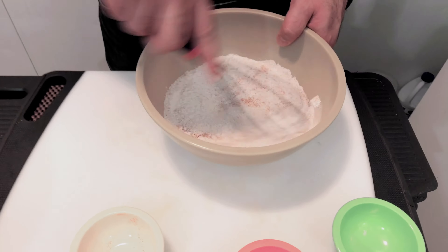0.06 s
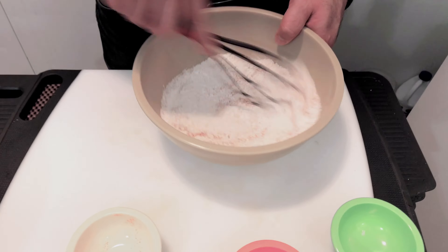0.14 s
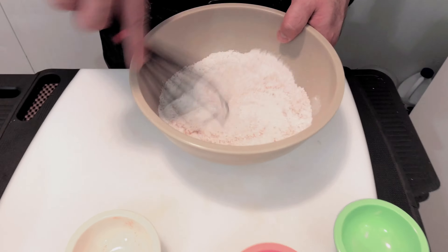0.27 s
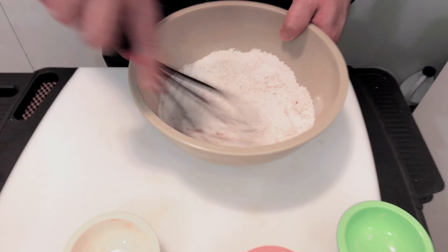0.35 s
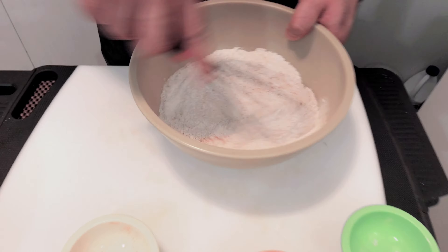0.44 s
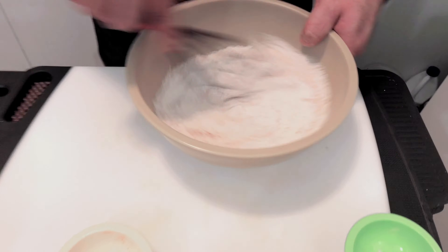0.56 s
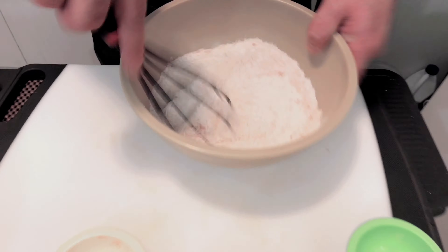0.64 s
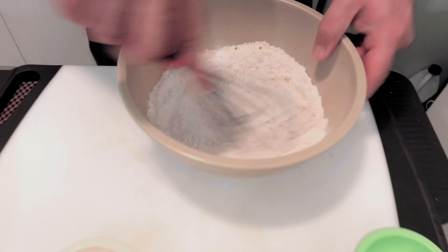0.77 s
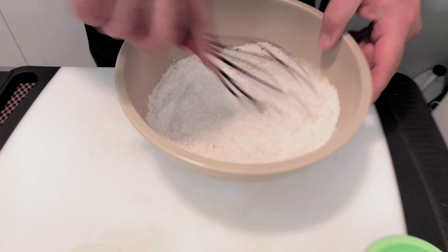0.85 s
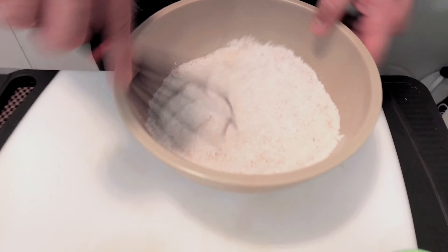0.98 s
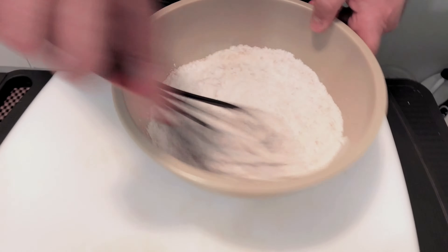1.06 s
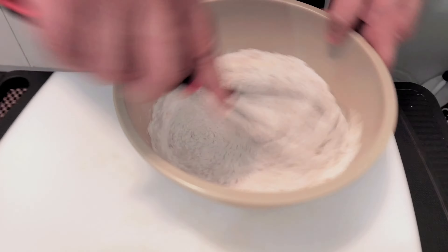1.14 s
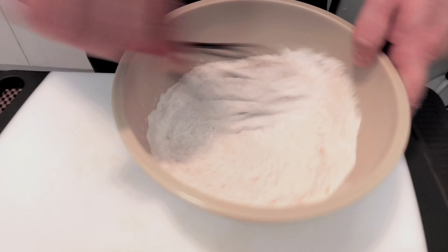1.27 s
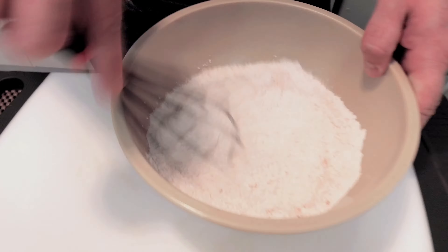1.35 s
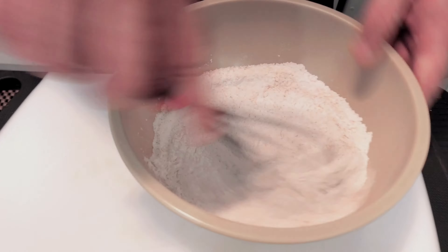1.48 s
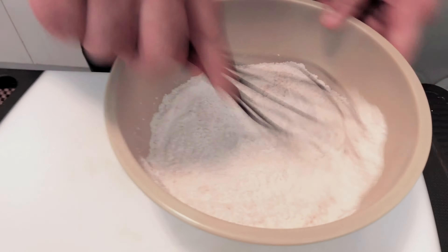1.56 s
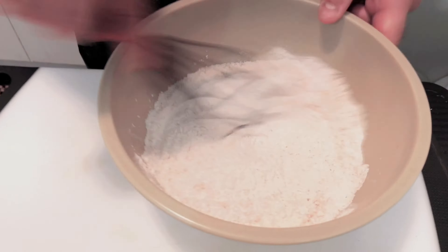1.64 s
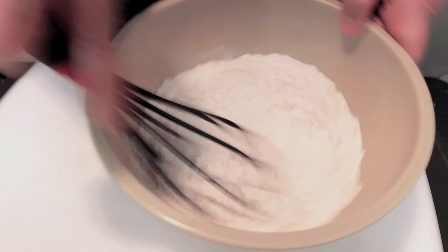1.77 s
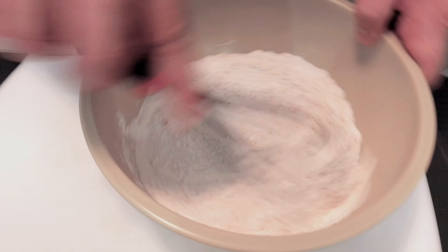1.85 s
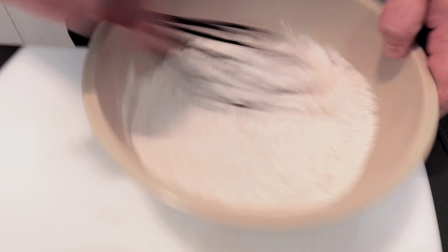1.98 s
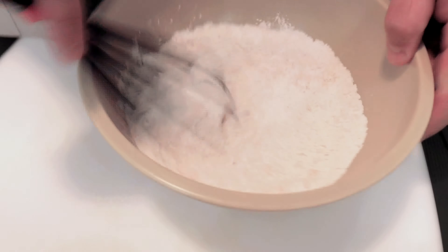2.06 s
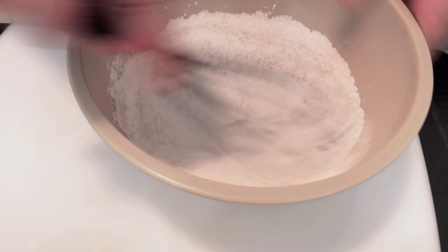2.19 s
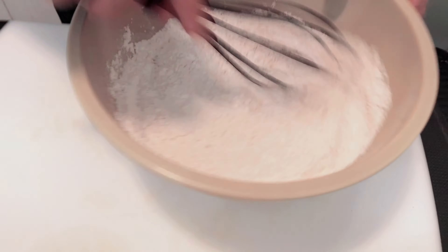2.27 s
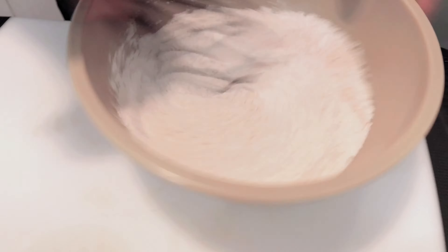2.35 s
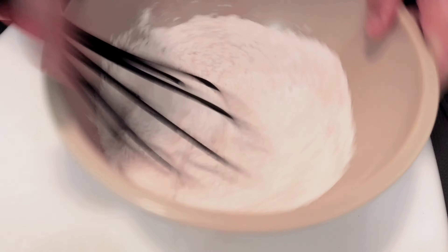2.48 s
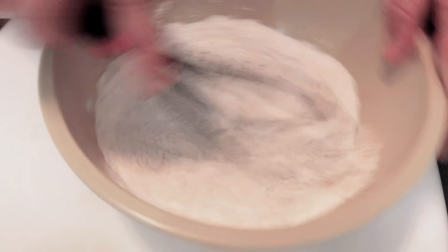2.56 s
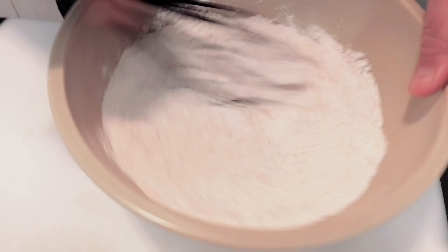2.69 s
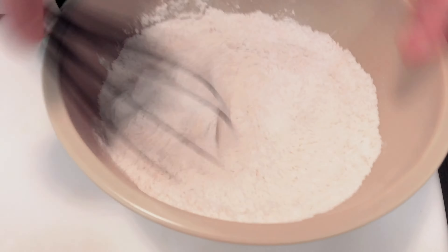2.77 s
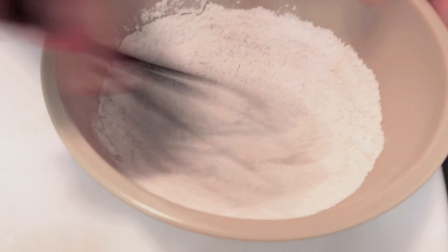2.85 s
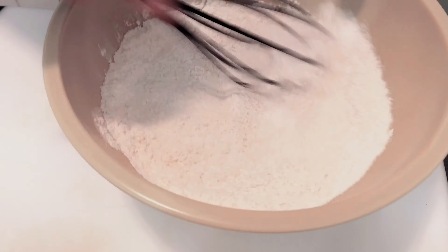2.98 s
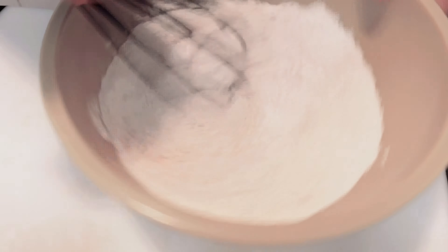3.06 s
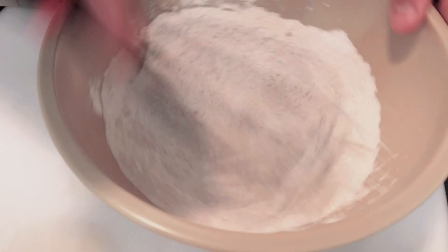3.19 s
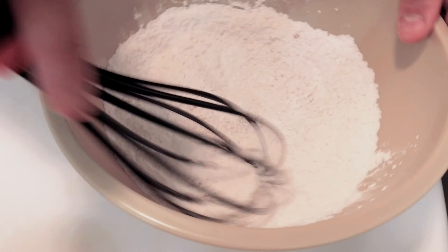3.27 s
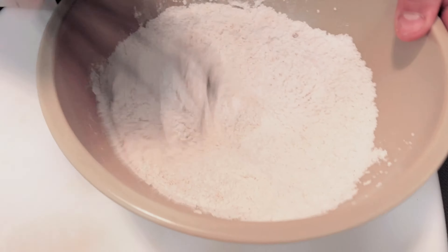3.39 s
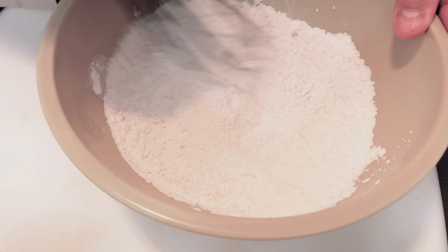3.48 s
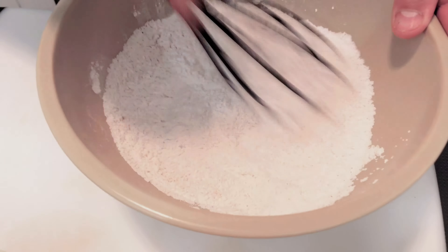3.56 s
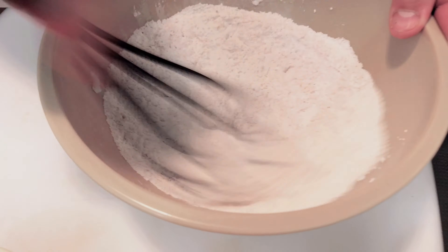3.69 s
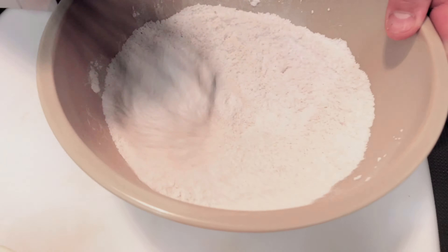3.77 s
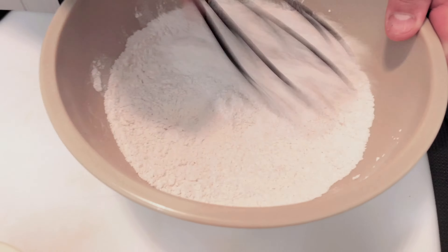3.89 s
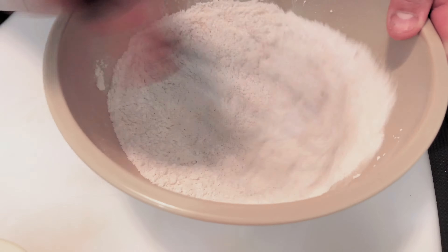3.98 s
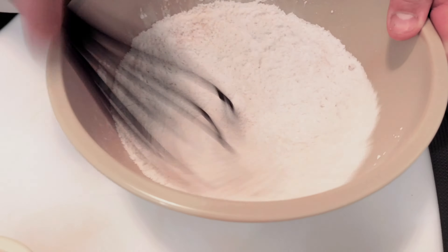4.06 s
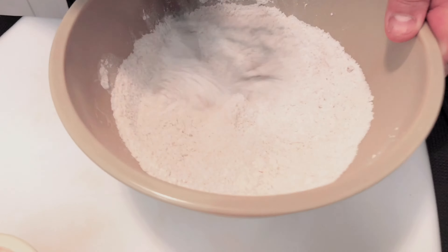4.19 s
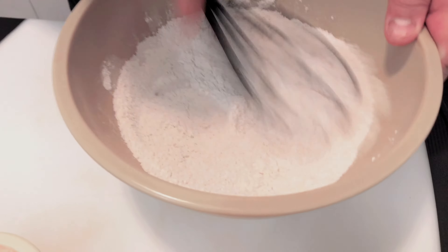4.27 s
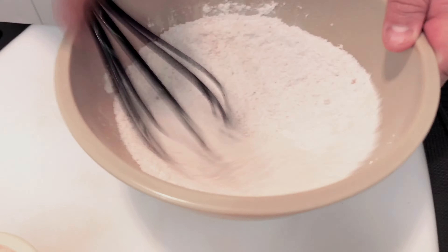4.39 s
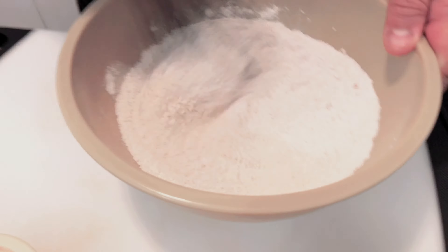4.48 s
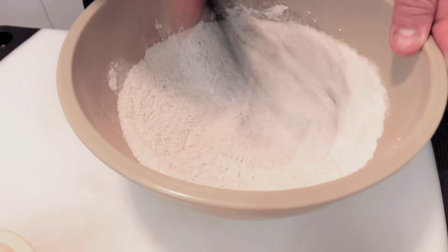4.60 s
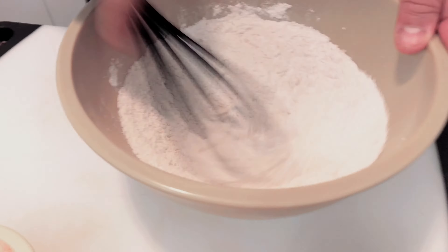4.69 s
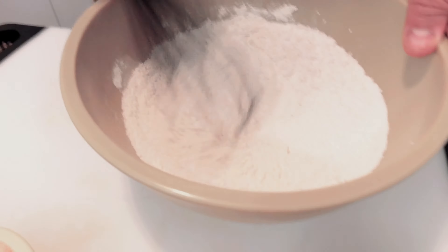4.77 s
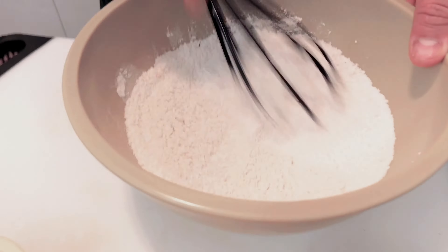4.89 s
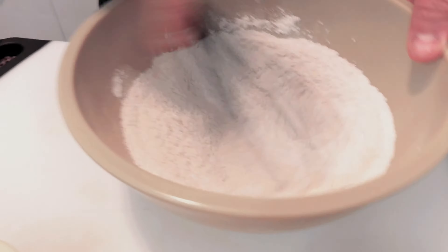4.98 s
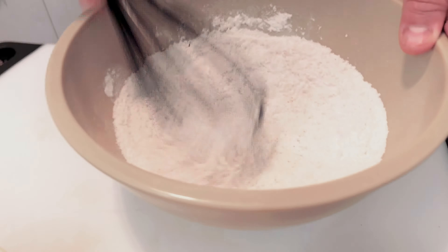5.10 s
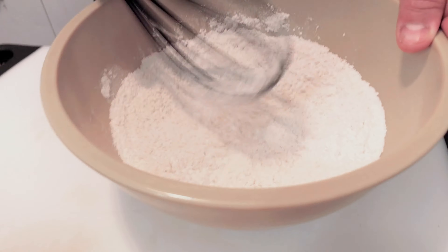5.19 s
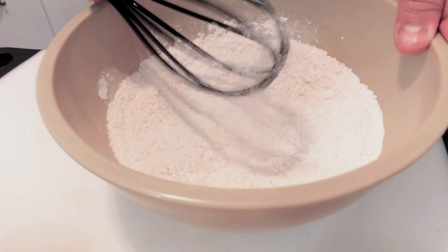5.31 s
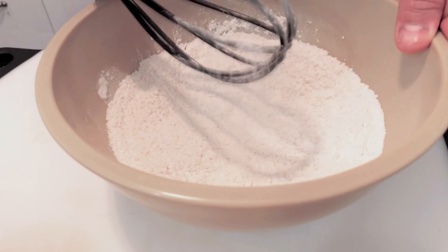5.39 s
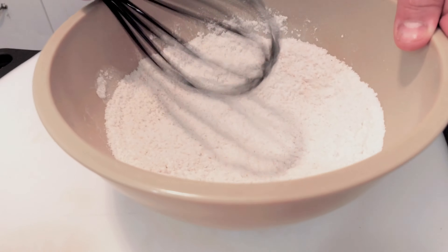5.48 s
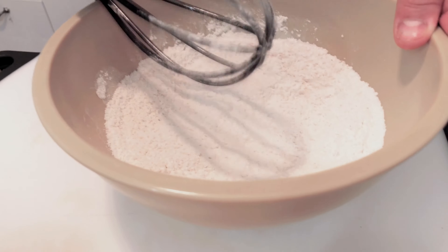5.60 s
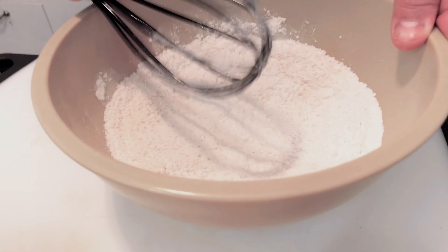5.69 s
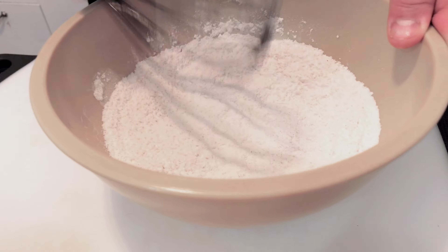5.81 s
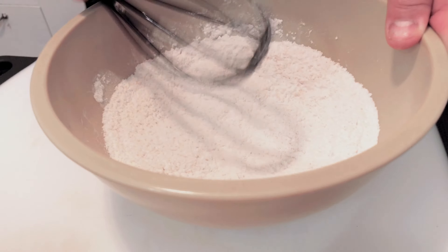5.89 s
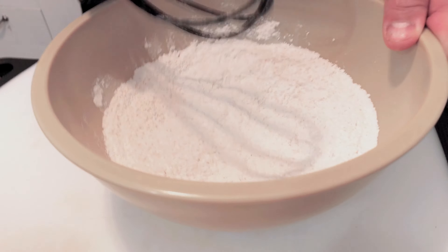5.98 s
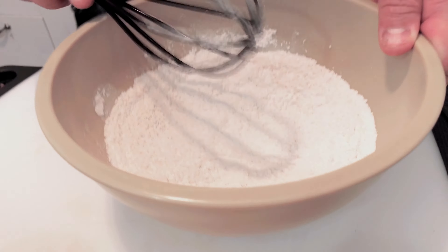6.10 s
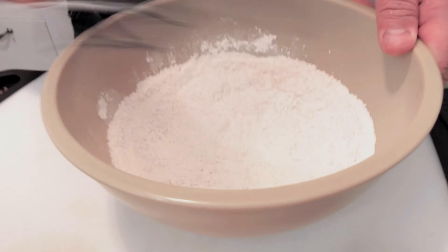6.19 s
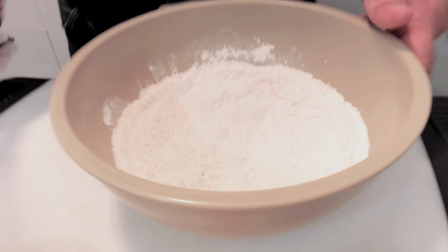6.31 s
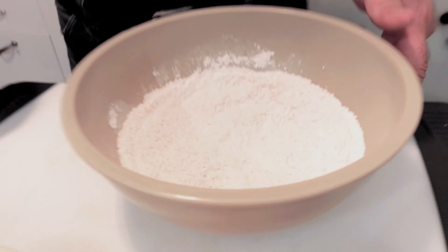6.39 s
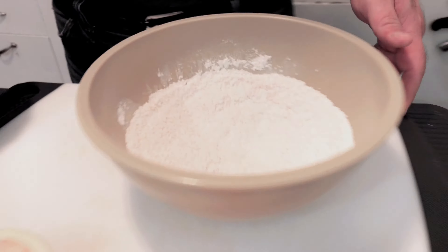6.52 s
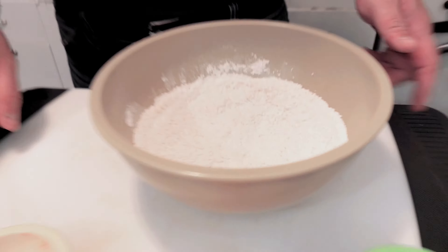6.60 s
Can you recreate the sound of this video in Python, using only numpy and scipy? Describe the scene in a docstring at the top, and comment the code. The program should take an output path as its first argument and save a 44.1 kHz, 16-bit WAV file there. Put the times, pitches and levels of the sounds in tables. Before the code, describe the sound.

Close, scratchy whisking of flour in a plastic bowl, ending with five ringing taps, two light clicks and a hollow clunk.

```python
"""A wire whisk scrapes and ticks through flour in a plastic mixing bowl, close by in a small kitchen.
Stick-slip friction excites the wires and the wall, and a gripping wire adds a gliding squeak.
Five raps on the rim follow: the steel loops ring, the bowl rocks and the worktop shudders.
Two light clicks and a dull clunk end the scene as the whisk is put aside."""
import sys
import numpy as np
from scipy import signal
from scipy.fft import rfft, irfft, next_fast_len
from scipy.io import wavfile
from scipy.ndimage import uniform_filter1d, map_coordinates

SR = 44100
rng = np.random.default_rng(int(sys.argv[2]) if len(sys.argv) > 2 else 0)


def materialize(psi):
    """Save the field psi as 16-bit PCM at rate SR to the path in sys.argv[1].

    A 1-D psi becomes a single channel; in a 2-D psi each row is a channel.
    """
    bounded = np.clip(np.atleast_2d(psi).T, -1, 1)
    quanta = np.round(bounded * 32767).astype(np.int16)
    wavfile.write(sys.argv[1], SR, quanta)


N = 293265


def amp(db):
    """Decibels to amplitude ratio."""
    return 10 ** (np.asarray(db) / 20)


def unit(x):
    """Normalisation to rms 1."""
    return x / np.sqrt(np.mean(x ** 2) + 1e-20)


def along(points, hz):
    """Interpolation of (frequency [Hz], value) points on a logarithmic frequency axis."""
    freqs, values = np.transpose(points)
    return np.interp(np.log(hz + 1), np.log(freqs + 1), values)


def seconds(count):
    """Time axis of count samples."""
    return np.arange(count) / SR


def add(track, s, sound):
    """Superposition: a sound joins the track at time s."""
    part = track[max(round(s * SR), 0):][:len(sound)]
    part += sound[:len(part)]


def wobble(rate):
    """Smooth random modulation: a spline through rate knots a second."""
    knots = rng.standard_normal(int(N * rate / SR) + 4)
    return map_coordinates(knots, [seconds(N) * rate])


def coloured(x, points):
    """Minimum-phase filtering by a spectrum of (frequency [Hz], level [dB]) points."""
    size = 2 * next_fast_len(len(x) // 2 + 4096)
    gain = amp(along(points, np.fft.rfftfreq(size, 1 / SR)))
    cepstrum = irfft(np.log(gain + 1e-6))
    cepstrum[1:size // 2] *= 2  # folding the cepstrum makes the filter causal
    cepstrum[size // 2 + 1:] = 0
    return irfft(rfft(x, size) * np.exp(rfft(cepstrum)))[:len(x)]


def ring(modes):
    """Free vibration: a sum of damped modes, each struck with random strength and sign."""
    t = seconds(SR // 3)
    strike = amp(rng.standard_normal(len(modes))) * rng.choice([-1, 1], len(modes))
    return sum(gain * amp(db - 60 * t / t60) * np.sin(2 * np.pi * hz * t)
               for gain, (hz, db, t60) in zip(strike, modes))


def chatter(spectrum, hold_s, t60):
    """Contact noise: a filtered burst that holds briefly, then decays exponentially."""
    t = seconds(SR // 8)
    envelope = amp(-60 * np.maximum(t - hold_s, 0) / t60)
    burst = coloured(rng.standard_normal(len(t)) * envelope, spectrum)
    return burst * np.linalg.norm(envelope) / np.linalg.norm(burst)


# Spectrum of the room noise: (frequency [Hz], spectral level [dB])
ROOM_NOISE = [(15, -12.5), (25, -2), (70, -8), (97, -7.5), (130, -29.5), (161, -17.5), (242, -32.5),
              (301, -20), (796, -33.5), (1400, -34), (2840, -36), (14800, -41), (16000, -57)]
def background(hum_hz=45.0):
    """Ambient noise: a quiet broadband floor and a low, amplitude-modulated hum."""
    hum = amp(-58 + 2.2 * wobble(2.7)) * np.sin(2 * np.pi * hum_hz * seconds(N))
    return hum + amp(-56) * unit(coloured(rng.standard_normal(N), ROOM_NOISE))


# Reverberation time of the kitchen: (frequency [Hz], t60 [s])
ROOM_DECAY = [(100, 0.29), (500, 0.45), (4000, 0.35), (9000, 0.23), (16000, 0.11)]
def kitchen(x, gap_s=0.0055):
    """Reverberation: convolution with a diffuse tail in which each frequency decays at its own rate."""
    hz, t, spectra = signal.stft(rng.standard_normal(SR // 2), SR, nperseg=256)
    decay = amp(-60 * t / along(ROOM_DECAY, hz)[:, None])
    tail = signal.istft(spectra * decay, SR, nperseg=256)[1]
    tail = np.pad(tail, (round(gap_s * SR), 0))
    return signal.fftconvolve(x, tail / np.linalg.norm(tail))[:N]


# Something heavy set down nearby: (time [s], level [dB])
CLUNK_IMPACT = (6.597, -15)
# Its contact noise: (frequency [Hz], spectral level [dB])
CLUNK_SPECTRUM = [(60, -5), (170, -14), (265, 0.5), (430, -21), (560, -5), (700, 1.5), (1000, -2.5),
                  (1500, -7.5), (2200, -16), (3000, -25), (5000, -40.5), (12000, -49.5)]
# Its resonances: (frequency [Hz], level [dB], t60 [s])
HOLLOW_MODES = [(222, -1, 0.13), (268, 0, 0.13), (650, 2, 0.054), (695, 6, 0.066), (897, 1, .06),
                (1010, -19, 0.12)]
def clunk():
    """Impact excitation: a dull contact sets low, hollow modes ringing."""
    out = np.zeros(N)
    s, db = CLUNK_IMPACT
    add(out, s, amp(db) * chatter(CLUNK_SPECTRUM, hold_s=0.0048, t60=0.012))
    add(out, s, amp(db - 4) * ring(HOLLOW_MODES))
    return out


# The bowl is jolted or drops on its base: (time [s], level [dB], hardness [dB], worktop level [dB])
BASE_BUMPS = [ (1.078, -35.5, -60, -39), (1.384, -33, -20, -45), (1.816, -30, -15, -27),
              (2.495, -31.5, -15.5, -31), (2.659, -30.5, 6, -52), (3.24, -27.5, 15, -38),
              (4.533, -32, -16, -52), (5.319, -29, -18, -47), (5.711, -28.5, -12, -49),
              (5.902, -20, -4, -50.5), (6.122, -25.5, -13, -50), (6.43, -33, 3, -48), (6.504, -37, -2, -36)]
def jolts(rim_to_base_s=0.004):
    """Structure-borne transmission: landings, bumps and raps all push the bowl; rows as in BASE_BUMPS."""
    landings = [(s, db, -4, db - 6.5) for s, *_, db in SWEEPS]
    blows = [(s + rim_to_base_s, db - 7, -5, db - 2.6) for s, db, *_ in RIM_RAPS]
    return landings + list(BASE_BUMPS) + blows


def worktop(hz=49.25, t60=0.25, tail_t60=0.82, rise_s=0.0096, lag_s=0.004):
    """Damped oscillation: each jolt starts a low swing of the worktop, with a faint long tail."""
    out, t = np.zeros(N), seconds(SR)
    decay = amp(-60 * t / t60) + amp(-18 - 60 * t / tail_t60)
    swing = np.sin(2 * np.pi * hz * t) * decay * (1 - np.exp(-t / rise_s))
    for s, _, _, db in jolts():
        add(out, s + lag_s, amp(db) * swing)
    return out


# Resonances of the plastic bowl: (frequency [Hz], level [dB], t60 [s])
BOWL_MODES = [(88.7, -1.5, 0.13), (124.6, 2, 0.071), (172.3, -1.5, 0.12), (216.7, -3, 0.15),
              (263.4, 3.5, 0.069), (296, 0, 0.029), (390, -19, 0.12), (560, -2.5, 0.022), (720, -8, 0.076),
              (993, 2, 0.016), (1126, -7, 0.038), (1283, -11.5, 0.059)]
def rocking_bowl(soft_hz=480):
    """Modal response: the harder a jolt, the more strongly it excites the modes above soft_hz."""
    out = np.zeros(N)
    for s, db, hardness_db, _ in jolts():
        modes = [(hz, mode_db + hardness_db * np.clip(np.log2(hz / soft_hz), 0, 1), t60)
                 for hz, mode_db, t60 in BOWL_MODES]
        add(out, s, amp(db - 10.5) * ring(modes))
    return out


def buzz(hz, width_hz, t60):
    """Line broadening: loops ring against each other, and random phase drift smears their pitch."""
    t = seconds(SR // 3)
    drift = np.cumsum(rng.standard_normal(len(t))) * np.sqrt(2 * np.pi * width_hz / SR)
    return np.sin(2 * np.pi * hz * t + uniform_filter1d(drift, size=24)) * amp(-60 * t / t60)


# Blows on the rim: (time [s], level [dB], loop pitch [Hz], loop gain [dB], zing pitch [Hz], zing gain [dB])
RIM_RAPS = [ (5.2717, -19.5, 4970, -11, 5990, -0.5), (5.4753, -22, 4700, -4.5, 5830, -4.5),
            (5.6531, -20, 4170, -4.5, 10100, -7.5), (5.8463, -17.5, 4020, -0.5, 9500, -2.5),
            (6.0604, -18, 3840, -1, 8780, 1)]
# Contact noise of steel on the rim: (frequency [Hz], spectral level [dB])
RAP_SPECTRUM = [(300, -20), (1100, -10.5), (1650, -10.5), (2400, -2.5), (4000, -9), (6000, -1),
                (7500, -7.5), (10500, -3.5), (13500, -3), (16000, -16)]
# Resonances of the steel loops: (frequency [Hz], level [dB], t60 [s])
LOOP_MODES = [(1600, 7, 0.063), (2700, -8.5, 0.083), (3060, -14, 0.14), (3790, 0.5, 0.14),
              (4100, -0.5, 0.21), (4870, -4, 0.16), (5770, -18, .12), (6406, -17, .12), (8400, -19, .15),
              (9356, -12, .15), (9674, -10, 0.1), (10980, -10, .15)]
def raps():
    """Selective excitation: the loops clatter on the rim, and where they land sets which of them ring."""
    out = np.zeros(N)
    for s, db, loop_hz, loop_db, zing_hz, zing_db in RIM_RAPS:
        add(out, s, amp(db) * chatter(RAP_SPECTRUM, hold_s=0.0027, t60=0.0081))
        add(out, s, amp(db - 27) * ring(LOOP_MODES))
        add(out, s, amp(db + loop_db) * buzz(loop_hz, width_hz=230, t60=0.048))
        add(out, s + 0.00064, amp(db + zing_db + 10) * buzz(zing_hz, width_hz=970, t60=0.012))
    return out


# Single wires snap against the wall: (time [s], level [dB], wall knock gain [dB])
WIRE_SNAPS = [ (0.1727, -15.5, -25), (0.8864, -19, -5), (1.597, -16.5, -20), (1.937, -17, -29),
              (2.0656, -8, -19), (2.073, -16, -8.5), (2.242, -10.5, -4), (2.396, -6.5, -15),
              (3.199, -29, -9), (3.2414, -21.5, -19), (3.9, -7, -10), (3.987, -9, -10.5),
              (4.441, -14.5, -14), (4.677, -18.5, -22), (5.5195, -27.5, -11), (6.111, -37, 3.5),
              (6.4283, -27, 2), (6.502, -29.5, 6)]
# Contact noise of one wire: (frequency [Hz], spectral level [dB])
TICK_SPECTRUM = [(500, -1), (2000, -28.5), (3800, 9), (6000, 2), (8500, 0), (12000, -3), (16000, -6)]
def ticks():
    """Impact transients: a wire flicks the wall, which answers with a short knock."""
    out = np.zeros(N)
    for s, db, knock_db in WIRE_SNAPS:
        add(out, s, amp(db - 12) * chatter(TICK_SPECTRUM, hold_s=0.0022, t60=0.015))
        add(out, s, amp(db + knock_db - 10) * chatter(WALL_SPECTRUM, hold_s=0.00027, t60=0.018))
    return out


def grit(rate, spread_db):
    """Poisson impulses: tiny slips of wire over powder, rate a second, of uneven size; rms 1."""
    slips = rng.random(N) < rate / SR
    return unit(slips * rng.standard_normal(N) * amp(spread_db * rng.standard_normal(N)))


def wall_echo(x, delay_s, travel, reflection):
    """Comb filtering: the curved wall returns the scrape after a delay that wanders as the whisk moves."""
    lag = delay_s * SR * np.exp(travel * wobble(9))
    return unit(x + reflection * map_coordinates(x, [np.arange(N) - lag], order=3))


def arch(t, start, length):
    """Envelope of a grip: a rise from 0 to 1 and back."""
    return np.sqrt(np.abs(np.sin(np.pi * np.clip((t - start) / length, 0, 1))))


# A wire digs through to the wall, swells and squeaks:
# (time [s], duration [s], wire gain [dB], wall gain [dB], start pitch [Hz], end pitch [Hz])
WIRE_GRIPS = [ (0.248, 0.067, 0.5, 13, 2650, 2320), (0.453, 0.033, 6, 2.5, 5960, 7000),
              (0.57, 0.053, -0.5, 4.5, 2660, 1880), (0.884, 0.043, 0, -10, 9100, 4200),
              (1.248, 0.05, 4.5, 5.5, 6550, 5330), (1.33, 0.11, 2, 7, 5500, 3200),
              (1.608, 0.025, 2.5, 1.5, 7200, 6130), (1.70, 0.047, 4, 5.5, 4130, 4770),
              (1.948, 0.051, 3, -6, 7340, 4600), (2.009, 0.064, -3, 12, 1950, 1600),
              (2.13, 0.083, 3.5, 3, 9500, 10500), (2.284, 0.088, 5.5, 6, 5950, 5030),
              (2.681, 0.054, 3, 11.5, 4350, 5520), (2.995, 0.072, 5, 6.5, 6800, 8100),
              (3.315, 0.078, 4, 7.5, 5770, 5000), (3.709, 0.039, 2, 4, 9400, 8000),
              (3.775, 0.11, 1.5, -2.5, 5100, 8750), (4.031, 0.041, -0.5, 5.5, 3000, 2600),
              (4.104, 0.051, 4, 4, 2580, 2130), (4.437, 0.068, 7, 6.5, 2340, 2900),
              (4.505, 0.089, 2, -4.5, 6260, 8200), (4.785, 0.092, 9.5, 8, 3200, 7150),
              (4.97, 0.094, 6.5, 5, 2540, 3520), ]
def contact_resonances(x, patchy_db, squeak_db=6.5, width_octaves=0.34):
    """Time-varying resonance: peaks come and go as wires touch the wall; a grip adds a gliding one."""
    hz, t, spectra = signal.stft(x, SR, nperseg=256)
    patches = uniform_filter1d(rng.standard_normal(spectra.shape), size=3, axis=0)
    patches = uniform_filter1d(patches, size=9, axis=1)
    lift_db = patchy_db * unit(patches)
    for start, length, _, _, from_hz, to_hz in WIRE_GRIPS:
        pitch = from_hz * (to_hz / from_hz) ** np.clip((t - start) / length, 0, 1)
        peak = np.exp(-(np.log2((hz[:, None] + 1) / pitch) / width_octaves) ** 2)
        lift_db += squeak_db * arch(t, start, length) * peak
    gain, power = amp(lift_db), np.mean(np.abs(spectra) ** 2, axis=1)
    gain /= np.sqrt(power @ gain ** 2 / power.sum())  # resonances share out power without adding to it
    return unit(signal.istft(spectra * gain, nperseg=256)[1][:N])


# Sweeps through the flour:
# (start [s], end [s], attack [s], level [dB], fall over the sweep [dB], wall gain [dB], landing bump [dB])
SWEEPS = [ (0.0, 0.107, 0.0067, -37.5, -1.5, -16, -47), (0.151, 0.496, 0.0072, -36.5, 3, -12, -41.5),
          (0.523, 0.585, .004, -30.5, -1, -10, -34), (0.656, 0.838, 0.0065, -36, 2.5, -13, -41),
          (0.885, 0.984, 0.0041, -32.5, 7.5, -7.5, -31), (0.997, 1.163, 0.0077, -33, -1.5, -14.5, -41),
          (1.216, 1.544, 0.0055, -33, 3.5, -14, -34.5), (1.594, 1.886, 0.0018, -31.5, 1.5, -13.5, -35),
          (1.936, 2.218, 0.0036, -33, 3.5, -12, -31.5), (2.251, 2.557, 0.0032, -33, -1, -12, -30.5),
          (2.576, 3.054, 0.025, -32, 2, -13.5, -50), (3.09, 3.184, 0.029, -54.5, 4, 4.5, -52),
          (3.242, 3.599, 0.091, -31, 4, -13.5, -65), (3.614, 3.877, 0.033, -31, -4, -12, -48),
          (3.972, 4.26, 0.0076, -33, 5, -8.5, -35.5), (4.25, 4.643, 0.04, -33.5, 1.5, -11, -41),
          (4.67, 5.053, 0.0055, -36, 4, -9, -47), ]
def sweep_envelopes(bite_db=0.5, bite_s=0.02, lift_s=0.035, unsteady_db=1.0):
    """Amplitude envelopes of wires and wall: each sweep bites, slides and lifts off, swelling at grips."""
    t, wires, wall = seconds(N), np.zeros(N), np.zeros(N)
    for start, end, attack, db, fall_db, wall_db, _ in SWEEPS:
        touch = np.clip((t - start) / attack, 0, 1) * np.clip(1 - (t - end) / lift_s, 0, 1)
        on = touch > 0
        age = t[on] - start
        slope_db = fall_db * (age / (end - start) - 0.5)
        gain = touch[on] * amp(db + bite_db * np.exp(-age / bite_s) - slope_db)
        wires[on] += gain
        wall[on] += gain * amp(wall_db)
    for start, length, wires_db, wall_db, _, _ in WIRE_GRIPS:
        on = (t > start) & (t < start + length)
        swell = arch(t[on], start, length) ** 2
        wires[on] *= amp(wires_db * swell)
        wall[on] *= amp(wall_db * swell)
    hand = amp(unsteady_db * wobble(25))
    return hand * wires, hand * wall


# Wire sliding on powdered plastic: (frequency [Hz], spectral level [dB])
SCRAPE_SPECTRUM = [(1200, -26), (2400, -10.5), (3100, -11), (3550, -2.5), (4000, 1.5), (4800, -3),
                   (5600, -1), (6600, -3.5), (8500, -1.5), (10200, -5.5), (11200, -3), (12800, -5),
                   (15100, -9), (16000, -13.5)]
# Response of the bowl's wall: (frequency [Hz], spectral level [dB])
WALL_SPECTRUM = [(53, -35), (95, -13.5), (160, -15), (290, -6.5), (480, -18), (690, -12.5), (900, -5),
                 (1040, -7), (1340, -0.5), (1600, -7), (1950, -5.5), (2500, -13), (3200, -11), (4500, -57)]
def stirring():
    """Stick-slip friction: slips excite the wires and the wall, more densely in a harder sweep."""
    wire_gain, wall_gain = sweep_envelopes()
    slips_per_s = 6000 * (0.5 + np.minimum(unit(wire_gain), 2))
    judder = amp(1.77 * wobble(80) + 0.75 * wobble(300))  # wires catch and let go
    wires = coloured(grit(slips_per_s, spread_db=0), SCRAPE_SPECTRUM)
    wires = contact_resonances(wires, patchy_db=3.5)
    wires = wall_echo(wires, delay_s=0.0006, travel=0.2, reflection=0.32)
    wall = coloured(grit(slips_per_s / 2, spread_db=2.5), WALL_SPECTRUM)
    wall = contact_resonances(wall, patchy_db=4)
    wall = wall_echo(wall, delay_s=0.0015, travel=0.1, reflection=0.4)
    return judder * (amp(-1.96) * wire_gain * wires + amp(-1.63) * wall_gain * wall)


def scene():
    """Direct-to-reverberant ratio: the bowl is close and dry, the clunk further off and roomier."""
    near = stirring() + ticks() + raps() + rocking_bowl()
    far = clunk()
    reverberation = kitchen(amp(-13.5) * near + amp(-8.5) * far)
    return (near + far + reverberation + worktop() + background())[None]


def record(dry, top_hz=16000):
    """Band limiting: an ideal low-pass filter removes everything above top_hz."""
    size = next_fast_len(N + SR // 2)
    passband = np.fft.rfftfreq(size, 1 / SR) < top_hz
    return irfft(rfft(dry, size) * passband, size)[..., :N]


dry = scene()
out = record(dry)
materialize(out)
```